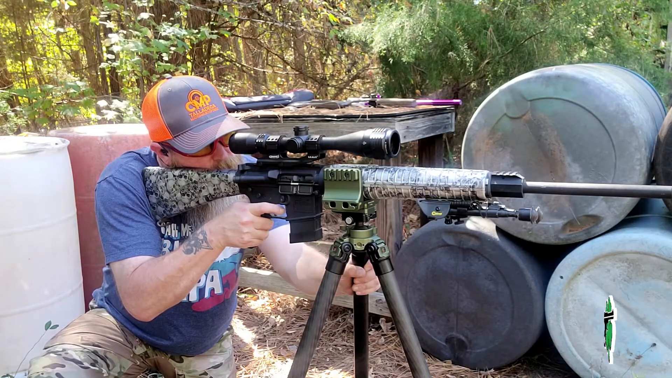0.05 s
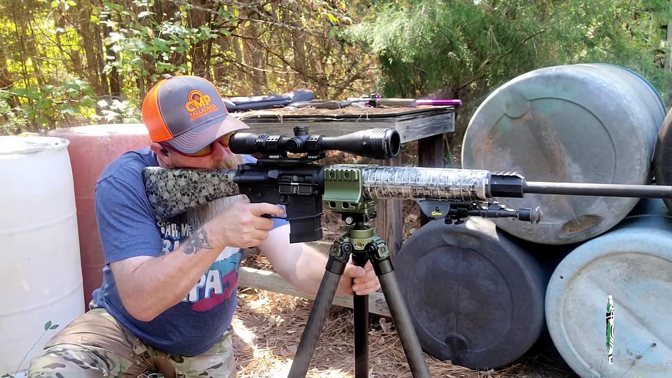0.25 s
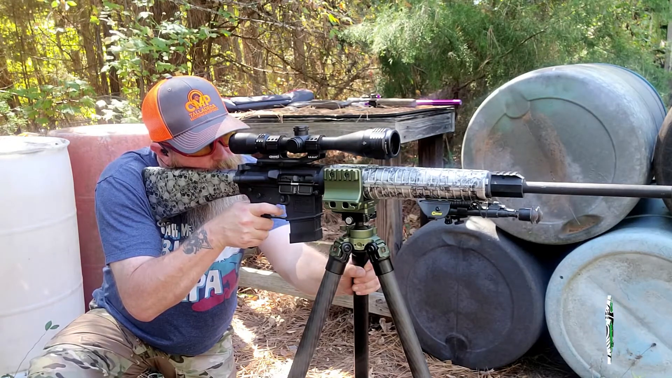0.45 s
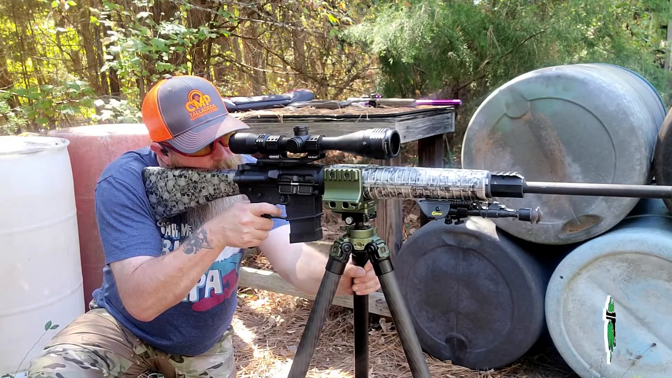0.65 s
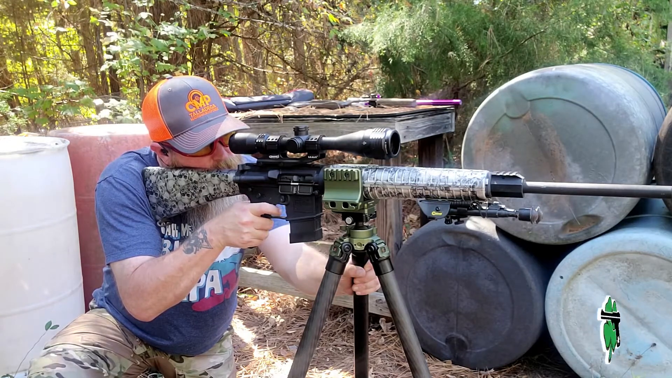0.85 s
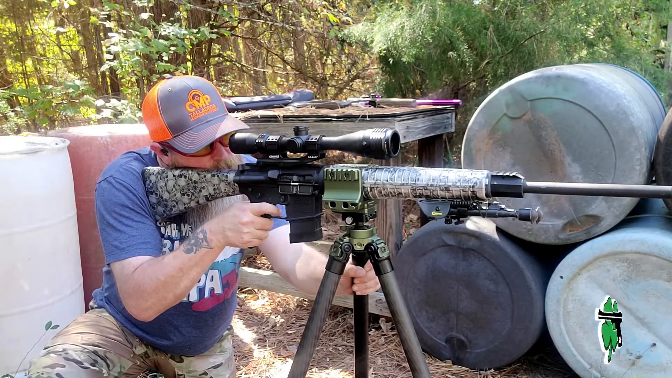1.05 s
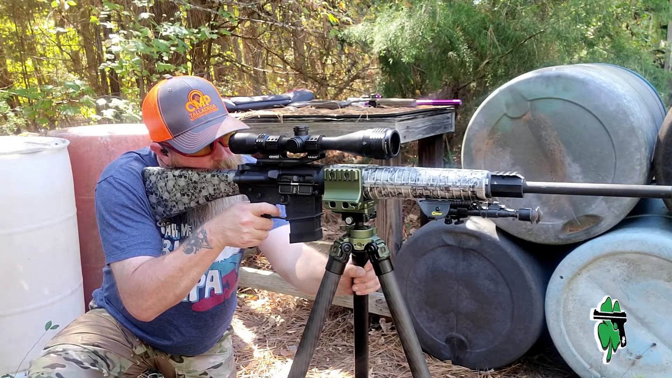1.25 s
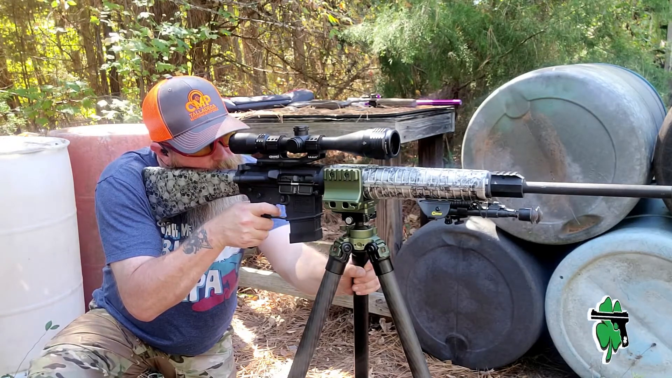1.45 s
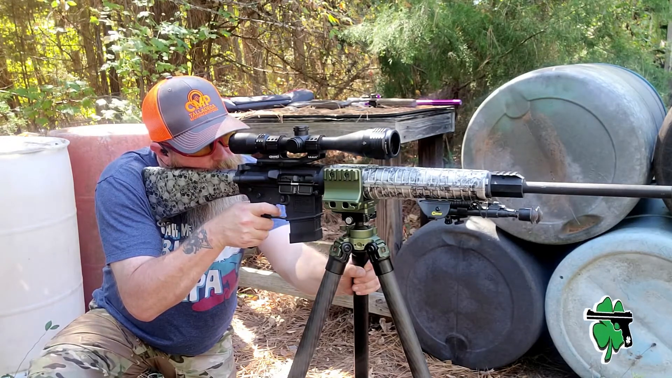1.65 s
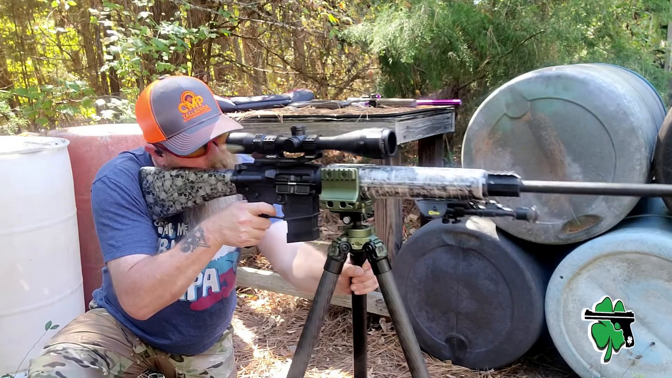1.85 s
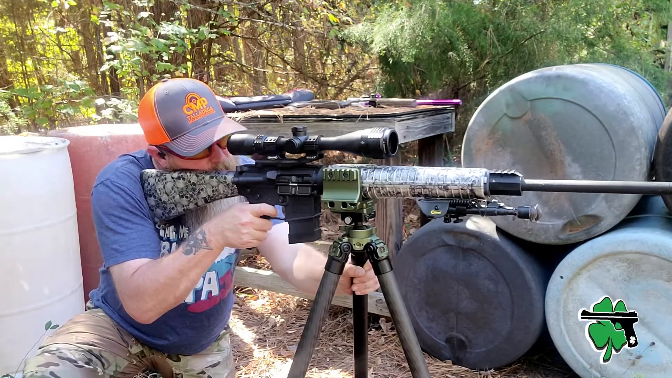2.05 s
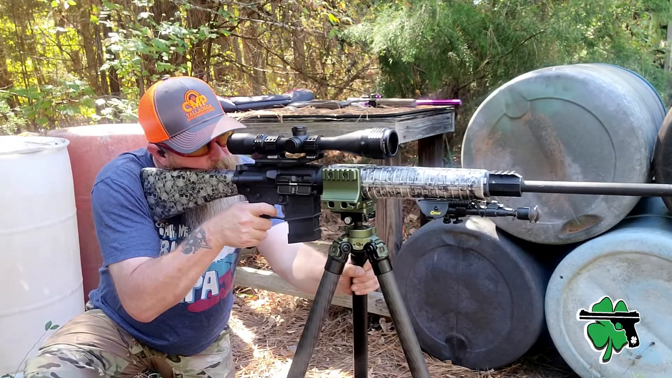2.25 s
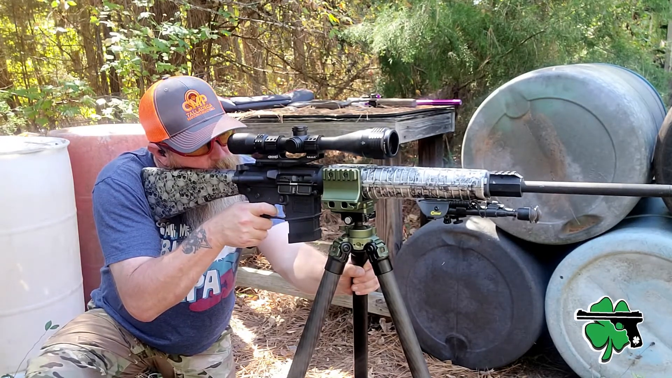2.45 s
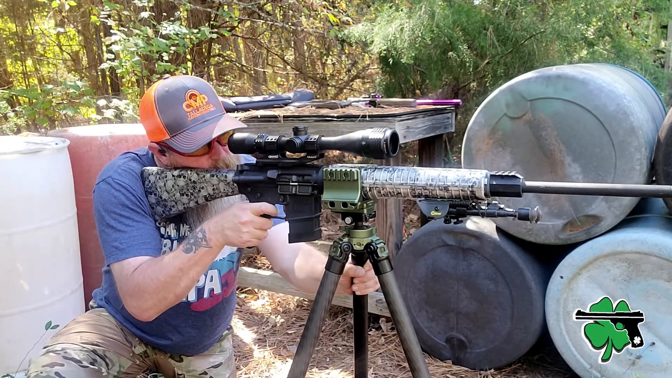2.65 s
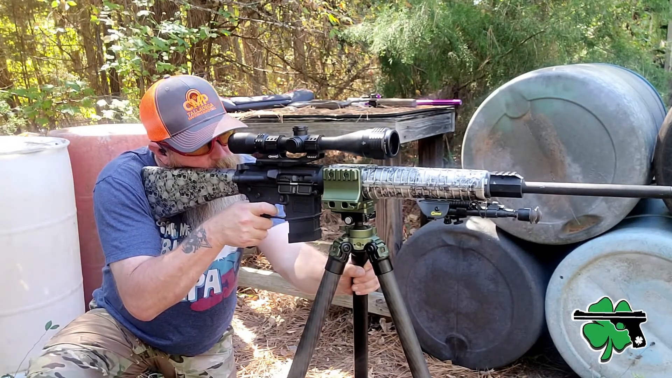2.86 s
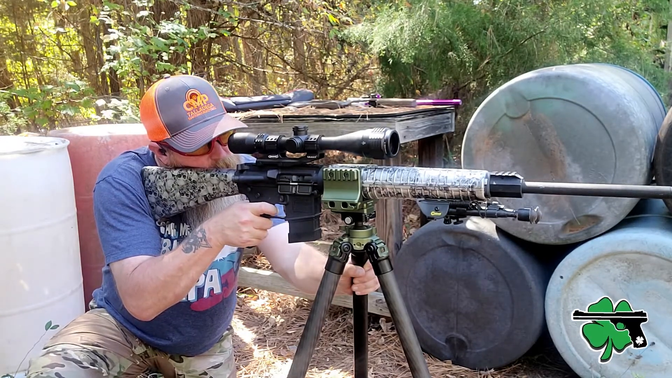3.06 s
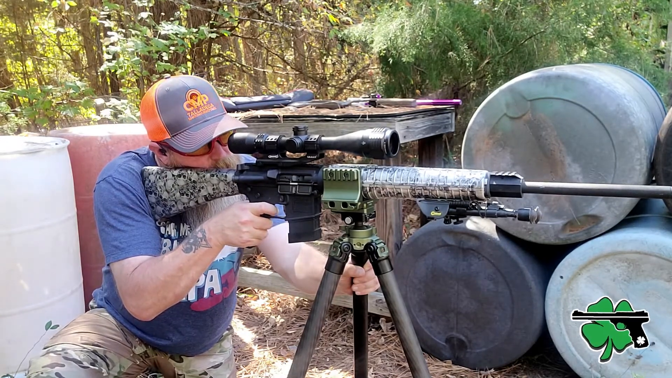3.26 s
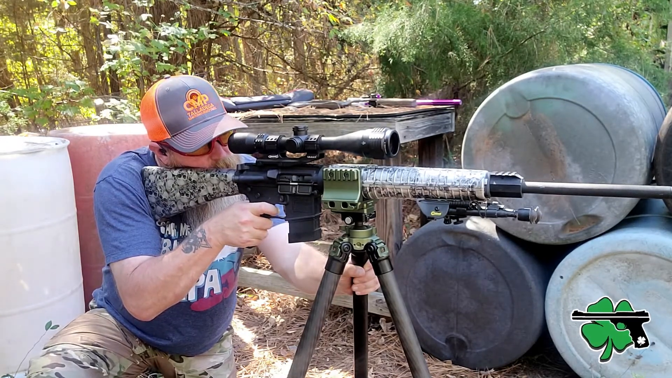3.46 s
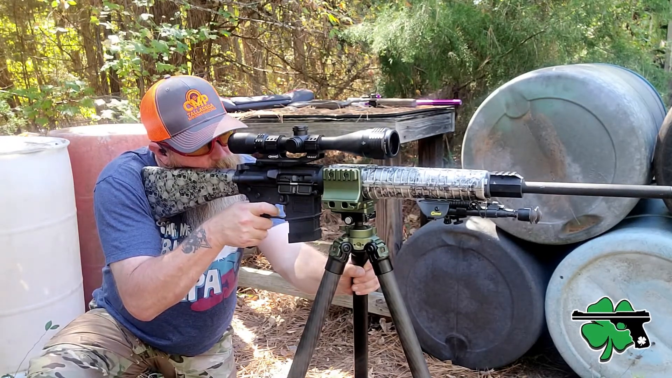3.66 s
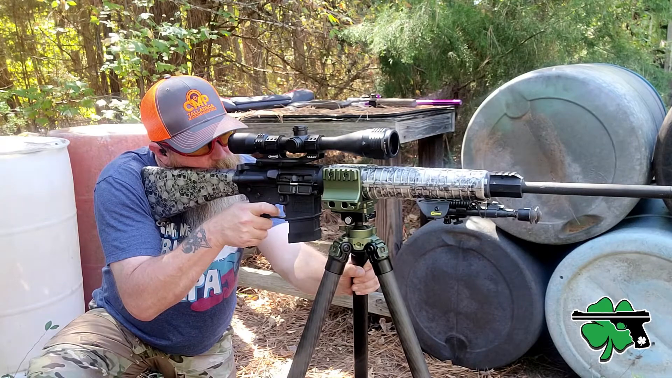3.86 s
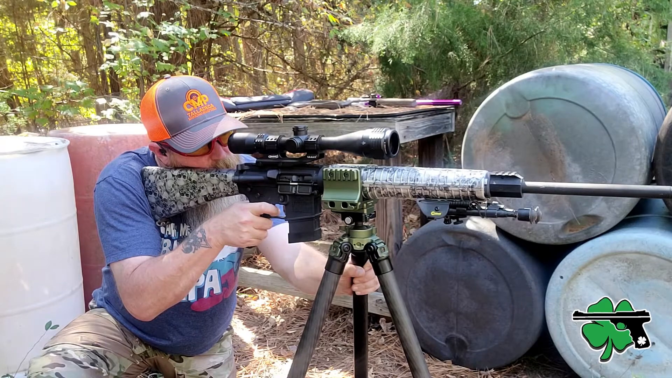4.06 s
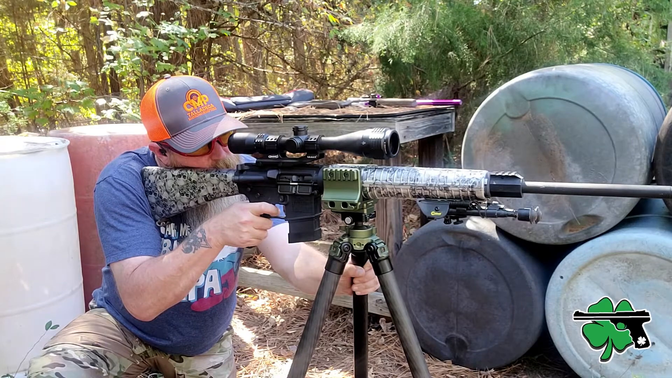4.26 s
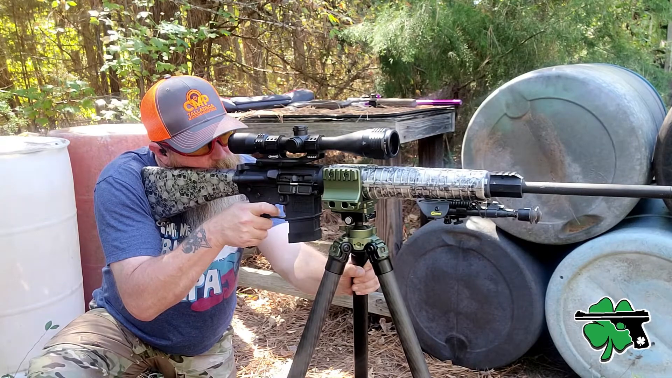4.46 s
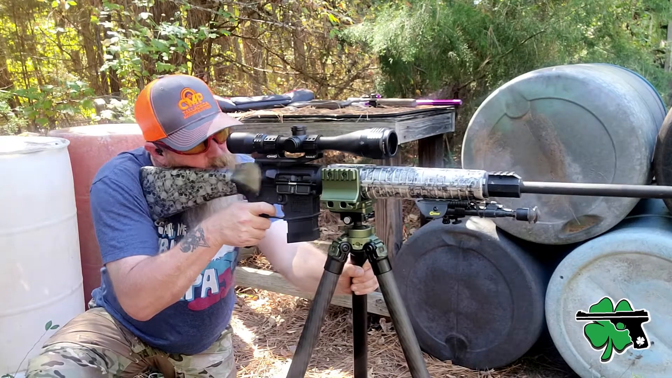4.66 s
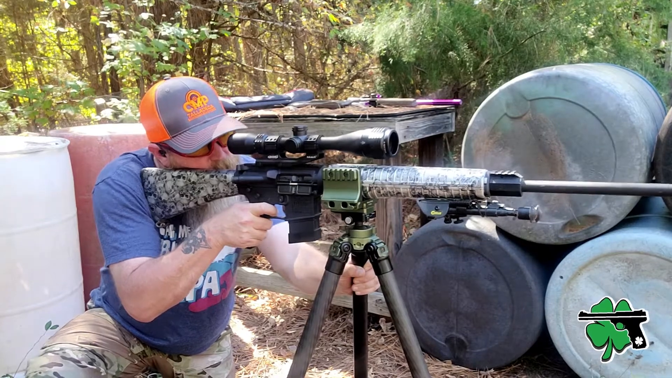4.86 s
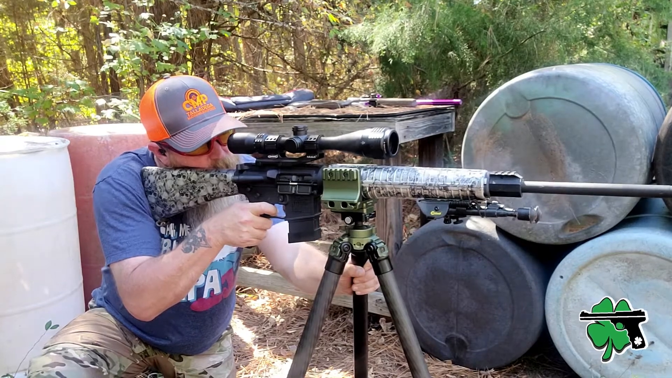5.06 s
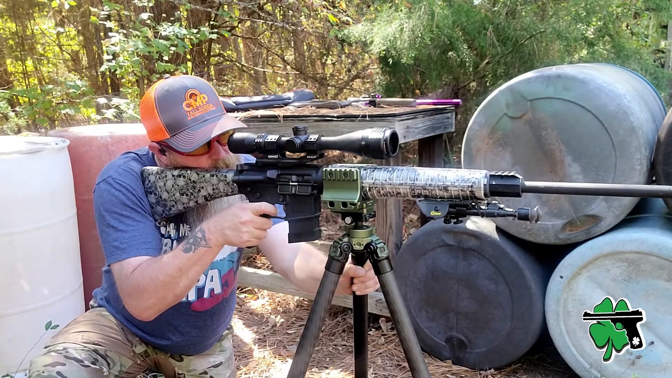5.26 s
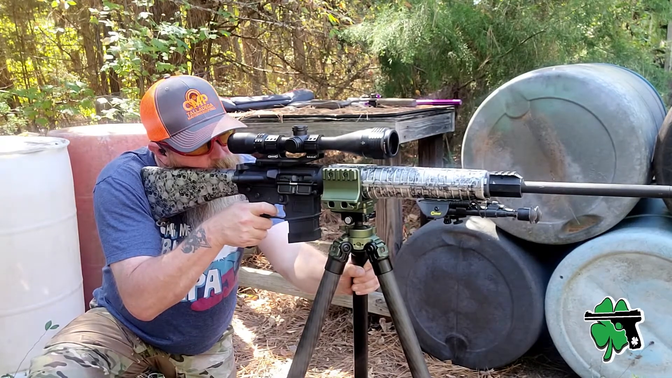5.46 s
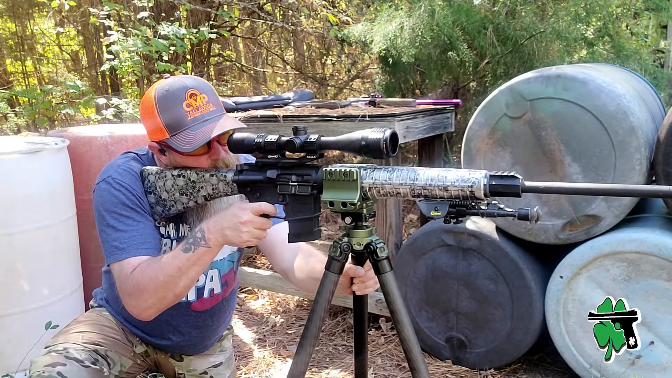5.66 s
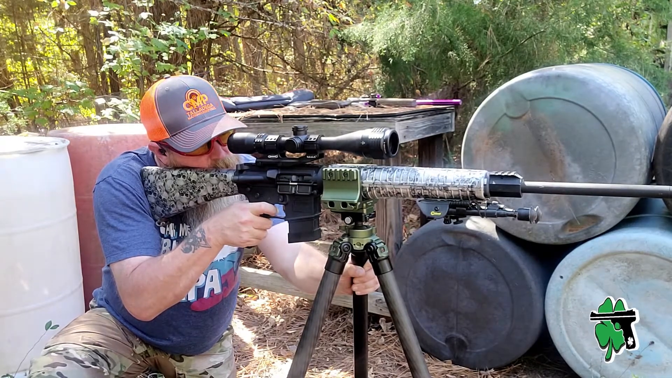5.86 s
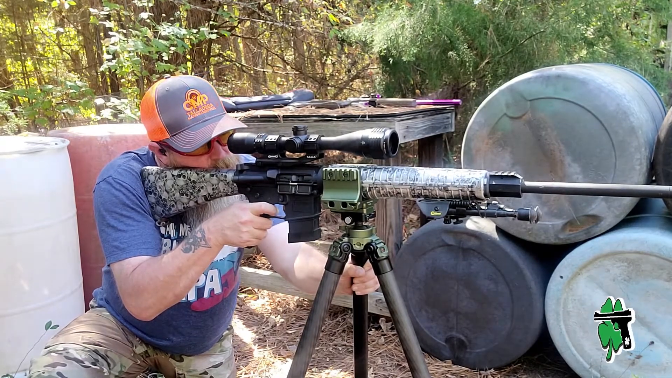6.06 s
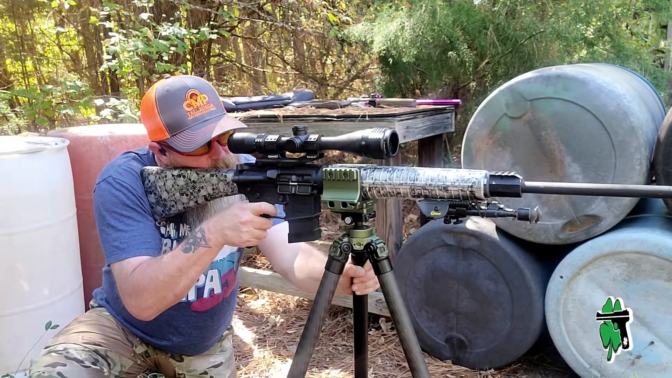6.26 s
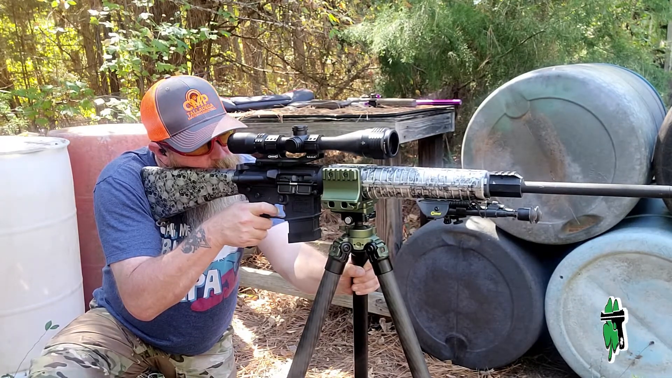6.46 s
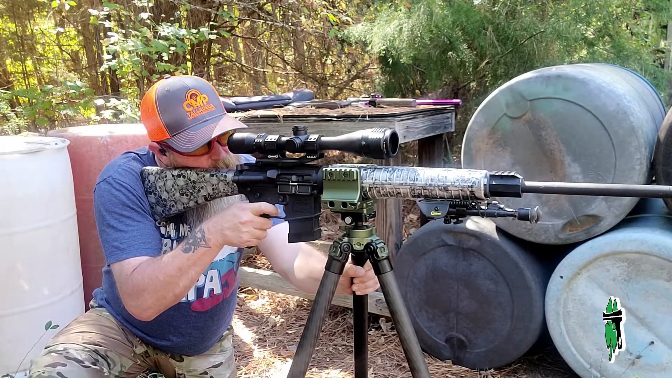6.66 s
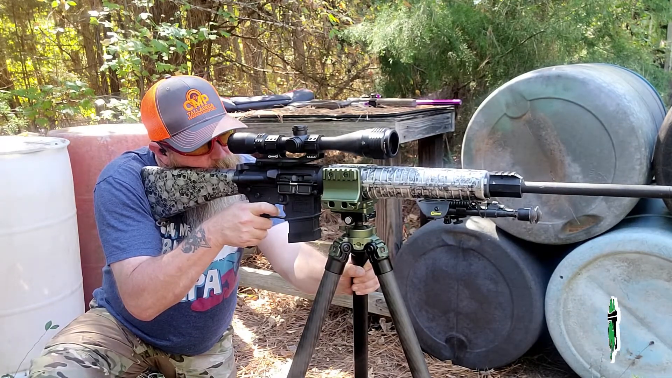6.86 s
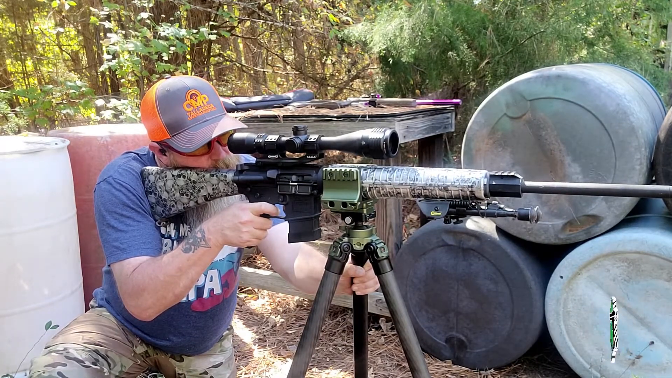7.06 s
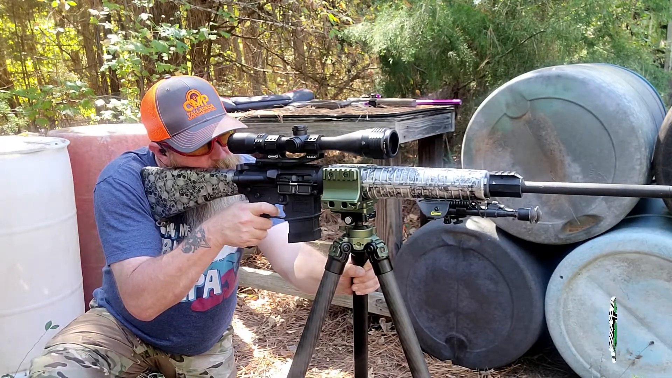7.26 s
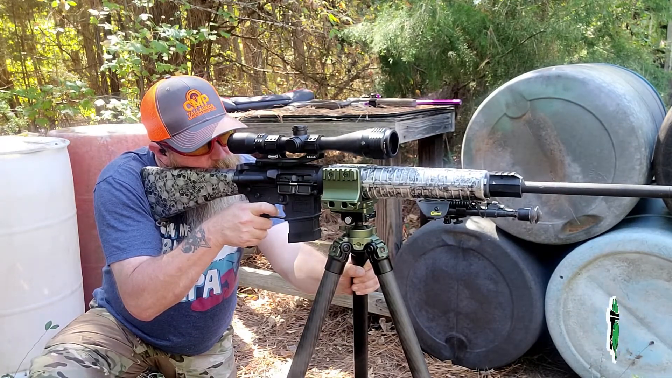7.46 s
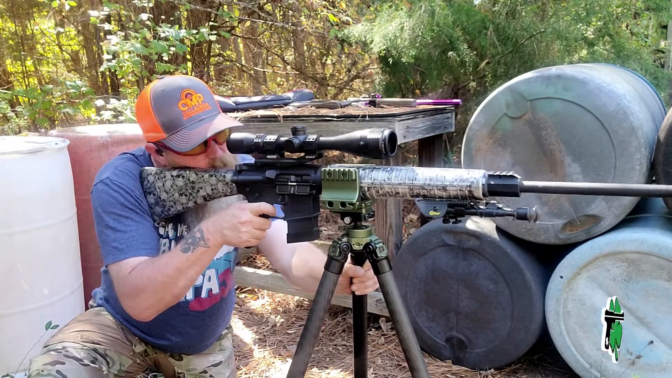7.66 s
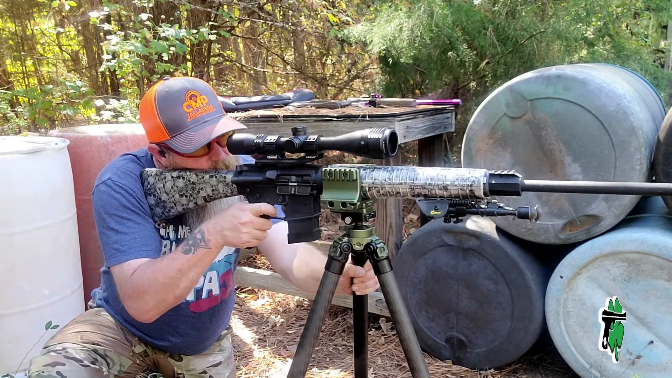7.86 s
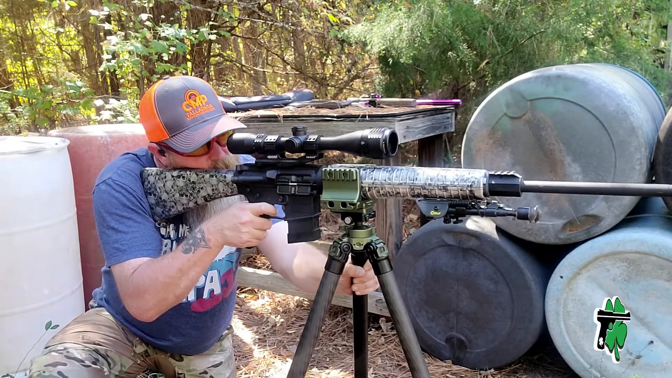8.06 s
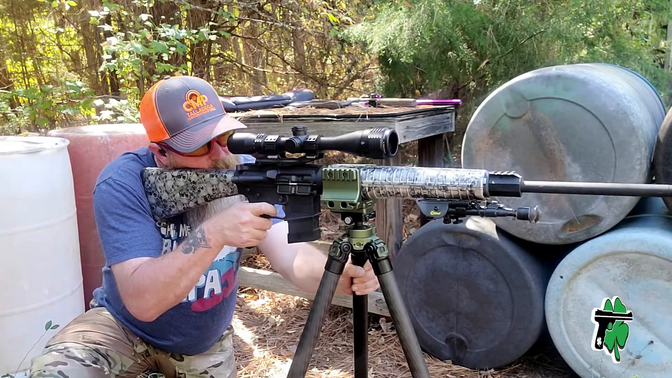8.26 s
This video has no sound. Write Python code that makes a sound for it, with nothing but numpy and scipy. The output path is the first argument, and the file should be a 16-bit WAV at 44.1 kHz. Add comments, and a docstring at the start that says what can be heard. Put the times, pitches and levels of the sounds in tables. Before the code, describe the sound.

Very faint outdoor air lies under the whole scene. A small, dull click comes from a rifle at about 0.3 seconds. At 1.9 seconds the semi-automatic rifle fires: a loud, sharp blast that overloads the close microphone, with the clack of the bolt cycling and a hollow boom from nearby plastic drums. Quick echoes come back from the trees, die down over about a second and roll on faintly. A sharp metallic click of the action follows at 3.6 seconds. The second shot comes at 4.6 seconds, and a spent brass case bounces with a bright tinkle around 5 seconds. The action clicks sharply again at 6.7 seconds. The third shot, just as loud, lands at 7.6 seconds and its echo fades, with a barely audible tick of brass near 8.2 seconds. The shots are centred and the clicks sit slightly right.

```python
"""Faint outdoor air and the clicks of a rifle's action, then three semi-automatic shots from a tripod.
Each time the hammer falls, the blast overloads a close microphone and the bolt cycles; plastic drums
beside the rifle boom along, and the edge of a wood throws the report back and lets it roll on.
Between shots the action clicks and spent cases tinkle; the gain ducks, then lets the air swell back."""
import sys
import numpy as np
from scipy import signal
from scipy.fft import rfft, irfft
from scipy.io import wavfile

SR = 44100
rng = np.random.default_rng(int(sys.argv[2]) if len(sys.argv) > 2 else 0)


def bounce(signal):
    """Save signal as a 16-bit WAV file at the path given by the first command-line argument."""
    frames = np.transpose(np.atleast_2d(signal))
    limited = np.clip(frames, -1, 1)
    pcm = np.round(limited * 32767).astype(np.int16)
    wavfile.write(sys.argv[1], SR, pcm)


N = 366030
TOP_HZ, TAIL_S = 15400, 1.8
T = np.arange(int(TAIL_S * SR)) / SR


def undb(db):
    """Decibels to gain."""
    return 10 ** (np.asarray(db) / 20)


def fade(t, t60):
    """Exponential decay, 60 dB in t60 seconds."""
    return np.exp(-np.log(1000) * t / t60)


def add(out, s, x):
    """Mix x into out from time s on."""
    i = max(int(s * SR), 0)
    out[i:i + len(x)] += x[:max(len(out) - i, 0)]


def across(table, hz, column=1):
    """Interpolate a table column over log frequency."""
    rows = np.array(table, float)
    return np.interp(np.log(hz + 1), np.log(rows[:, 0]), rows[:, column])


def butter(x, order, hz, kind):
    """Butterworth filter."""
    return signal.sosfilt(signal.butter(order, hz, kind, fs=SR, output="sos"), x)


def band(x, lo_hz, hi_hz):
    """Band-pass with second-order skirts."""
    return butter(x, 2, [lo_hz, min(hi_hz, SR / 2 - 1)], "band")


def unit(x):
    """Scale to unit rms."""
    return x / np.std(x)


def burst(table, noise):
    """Colour white noise; each half octave decays at its own rate."""
    n = len(noise)
    hz = np.fft.rfftfreq(n, 1 / SR)
    spectrum = rfft(noise) * undb(across(table, hz)) * np.sqrt(SR / 2)
    half_octaves = 2 * np.log2(np.maximum(hz, 20) / 20)
    out = np.zeros(n)
    for k in range(21):
        part = irfft(spectrum * np.maximum(1 - abs(half_octaves - k), 0), n)
        out += part * fade(T[:n], across(table, 20 * 2 ** (k / 2), column=2))
    return out


def thump(centre_s, hz, width_s):
    """Pressure wave of a cycle or two."""
    return -np.cos(2 * np.pi * hz * (T - centre_s)) * np.exp(-((T - centre_s) / width_s) ** 2)


# outdoor air: (frequency [Hz], relative density [dB])
AIR_SPECTRUM = [(15, -37), (25, -7.5), (59, -3), (118, -7), (158, -13), (326, -15.5), (415, -8.5),
                (558, -6.5), (637, -6.5), (927, -10.5), (1350, -24), (2370, -28.5), (5010, -25.5),
                (7480, -34.5), (15000, -36.5)]


def air(level_db=-64.5, stereo_spread=.3, hiss_db=-1, rush_hz=1300, swell_db=2.0, swell_s=.7):
    """A distant rush swells at random under an even hiss."""
    hz, t = np.fft.rfftfreq(N, 1 / SR), np.arange(N) / SR
    common, left, right = irfft(rfft(rng.standard_normal((3, N))) * undb(across(AIR_SPECTRUM, hz)), N)
    noise = undb(level_db) * unit(common + stereo_spread * np.array([left, right]))
    rush = irfft(rfft(noise) / (1 + (hz / rush_hz) ** 4), N)
    gusts = rng.standard_normal(40)
    swell = undb(swell_db * np.interp(t / swell_s, np.arange(len(gusts)), gusts))
    return rush * swell + undb(hiss_db) * (noise - rush)


def ring(modes, t):
    """Damped modes, random phases."""
    return sum(undb(db) * fade(t, t60) * np.sin(2 * np.pi * (hz * t + rng.random()))
               for hz, db, t60 in modes)


# receiver, stock and tripod legs, with the long rings of the plastic drums near 512 and 1076 Hz: (frequency
# [Hz], level [dB], t60 [s])
RIFLE_MODES = [(512, -39.5, .74), (515.4, -11, .045), (690, -4.5, .043), (860, -4.5, .036),
               (1045, 2.5, .045), (1076, -31.5, .15), (1344, -10, .027), (1487, -12.5, .028),
               (2140, -6.5, .026), (3050, -2.5, .024), (3400, -15.5, .018), (4000, -13, .018),
               (5278, -14.5, .041), (5880, -7, .022), (6800, -11.5, .022), (7200, -8.5, .022),
               (7980, -15, .02)]
# crack of a contact: (frequency [Hz], density [dB/Hz], t60 [s])
CRACK_SPECTRUM = [(60, -52, .04), (280, -42.5, .04), (700, -37.5, .035), (1810, -38.5, .022),
                  (3600, -36, .018), (6000, -36.5, .026), (9000, -42.5, .018), (15000, -50.5, .018)]


def contact(treble_db, pitch, length, rise_s=.0018, body_rise_s=.0045, body_hz=1600, lowest_hz=400):
    """Steel on steel: crack and bright modes first, then the heavier body; small parts radiate no bass."""
    t = T[:SR // 2]
    steel = [(hz * pitch, db + treble_db, t60 * length) for hz, db, t60 in RIFLE_MODES if hz > body_hz]
    body = [(hz * pitch, db, t60 * length) for hz, db, t60 in RIFLE_MODES if hz <= body_hz]
    spectrum = [(hz, db + treble_db * (hz > body_hz), t60 * length) for hz, db, t60 in CRACK_SPECTRUM]
    crack = burst(spectrum, rng.standard_normal(len(t)))
    blow = (ring(steel, t) + crack) * np.minimum(t / rise_s, 1) ** 2
    blow += ring(body, t) * np.minimum(t / (body_rise_s * length), 1)
    return butter(blow, 3, lowest_hz, "high")


# scatter of a click: (frequency [Hz], density [dB/Hz], t60 [s])
NEARBY_SPECTRUM = [(100, -83.5, .3), (330, -81, .4), (520, -69, 1.6), (950, -67.5, 1), (1500, -76.5, .42),
                   (5300, -78, .25), (9000, -79, .22), (15000, -84.5, .15)]


def surroundings(treble_db, treble_share=.4, treble_hz=1400):
    """Ground, drums and trees answer a click diffusely."""
    spectrum = [(hz, db + treble_share * treble_db * (hz > treble_hz), t60)
                for hz, db, t60 in NEARBY_SPECTRUM]
    return burst(spectrum, rng.standard_normal(SR))


# safety, trigger reset: (time [s], level [dB], treble [dB], pitch [ratio], ring length [ratio])
ACTION_CLICKS = [(.054, -53.5, -8, 0.87, 1.5), (.262, -16, -20, 0.92, 0.5), (3.6134, -10.5, 1, .99, 1.03),
                 (4.409, -43.5, -7.5, 0.95, 1.5), (6.6715, -8, 3, 1.01, 1)]


def clicks(left_db=.1, right_db=1.97, hardest_hz=19000, db_per_octave=20):
    """Action and hammer contacts, slightly right, duller when gentle, each with its scatter."""
    out = np.zeros(N)
    for s, db, treble_db, pitch, length in ACTION_CLICKS + hammer():
        cutoff_hz = min(hardest_hz * 2 ** (db / db_per_octave), TOP_HZ)
        add(out, s, undb(db) * butter(contact(treble_db, pitch, length), 2, cutoff_hz, "low"))
        add(out, s, undb(db) * length * surroundings(treble_db))
    return out * undb([[left_db], [right_db]])


# bumps on the microphone: (time [s], level [dB])
MIC_BUMPS = [(.108, -46.5), (.321, -53), (1.32, -55)]


def bumps(lead_s=.1):
    """Soft knocks on the microphone, one low pulse each."""
    out = np.zeros(N)
    for s, db in MIC_BUMPS:
        add(out, s - lead_s, undb(db) * thump(lead_s, hz=52.3, width_s=.02))
    return out


def hammer(lead_s=.0105, db=-11, treble_db=15, pitch=.94, length=.4):
    """Click rows for the hammer: a short, bright contact just before each shot."""
    return [(s - lead_s, db, treble_db, pitch, length) for s, _ in MUZZLE_BLASTS]


# shots: (time [s], level [dB])
MUZZLE_BLASTS = [(1.897, 6.5), (4.6415, 6.5), (7.631, 6.4)]


def shots(gas_db=-9):
    """Each shot: blast, gas thump, echoes, drum boom, wood scatter and bolt."""
    out, slaps = np.zeros(N), echoes()
    near_noise, far_noise = rng.standard_normal((2, len(T)))
    gas = undb(gas_db) * thump(centre_s=.031, hz=57, width_s=.012)
    for s, db in MUZZLE_BLASTS:
        report = blast(near_noise) + gas + slaps
        add(out, s, undb(db) * (report + drums(report) + wood(far_noise) + bolt()))
    return out


def paths(steady_noise, steady_hz=2200):
    """Long waves take the same paths every shot; moving air and leaves scramble the short ones."""
    steady_share = 1 / (1 + (np.fft.rfftfreq(len(T), 1 / SR) / steady_hz) ** 2)
    scrambled = rfft(rng.standard_normal(len(T))) * np.sqrt(1 - steady_share)
    return irfft(rfft(steady_noise) * np.sqrt(steady_share) + scrambled, len(T))


# near field of the blast: (frequency [Hz], density [dB/Hz], t60 [s])
BLAST_SPECTRUM = [(25, -60, .3), (70, -37.5, .25), (150, -33, .25), (300, -27, .15), (574, -20, .23),
                  (920, -23.5, .089), (1900, -20.5, .095), (3500, -26, .055), (6500, -21.5, .035),
                  (15000, -33.5, .061)]


def blast(noise, rise_s=.004):
    """Broadband muzzle burst; the bass outlasts the treble."""
    return burst(BLAST_SPECTRUM, paths(noise)) * np.minimum(T / rise_s, 1)


# hollow plastic drums: (frequency [Hz], bandwidth [Hz], gain [dB])
DRUM_MODES = [(540, 35, 0), (720, 30, -4.5), (70, 20, -3), (144, 40, -5.5), (353, 60, -8.5)]


def drums(report):
    """The drums resonate, driven by the report."""
    return sum(undb(db) * signal.lfilter(*signal.iirpeak(hz, hz / width_hz, SR), report)
               for hz, width_hz, db in DRUM_MODES)


# scatter from the wood: (frequency [Hz], density [dB/Hz], t60 [s])
WOOD_SPECTRUM = [(25, -75, 1.1), (65, -43.5, 1.35), (150, -39.5, 1.15), (410, -45.5, 1.305),
                 (650, -39, 1.35), (950, -40, 1.42), (1400, -50, 1.5), (2600, -43.5, 1.037),
                 (3600, -50, .97), (4900, -45.5, .8), (7110, -49.5, .65), (10450, -48.5, .47),
                 (15000, -50.5, .37)]


def wood(noise, rise_s=.012):
    """Trees scatter the blast into a long tail."""
    return burst(WOOD_SPECTRUM, paths(noise)) * np.minimum(T / rise_s, 1)


def reflection(t60_s, lo_hz, hi_hz, rise_share=.04):
    """One echo as a band of decaying noise; a deep reflector swells more slowly."""
    t = T[:SR // 2]
    envelope = fade(t, t60_s) * np.minimum(t / (rise_share * t60_s), 1)
    return unit(band(rng.standard_normal(len(t)), lo_hz, hi_hz) * envelope) * np.std(envelope)


# strongest slaps from banks and trunks: (delay [s], level [dB])
STRONG_SLAPS = [(.074, -3), (.088, -4.5), (.129, -6.5), (.145, -1.5), (.166, -7.5), (.228, -14.5),
                (.271, -18.5), (.342, -17.5)]
# wash from thickets: (delay [s], level [dB], upper edge [Hz])
THICKET_WASHES = [(.204, -21, 7340), (.46, -29, 1110)]


def echoes(trunks=14, first_s=.04, last_s=.55, trunk_db=-15, db_per_doubling=5.5):
    """Strong slaps, random trunk slaps that weaken with path length, and the thickets' soft wash."""
    out = np.zeros(len(T))
    delays_s = first_s + (last_s - first_s) * (np.arange(trunks) + rng.random(trunks)) / trunks
    weak_slaps = [(s, trunk_db - db_per_doubling * np.log2(s / first_s)) for s in delays_s]
    for s, db in STRONG_SLAPS + weak_slaps:
        add(out, s, undb(db) * reflection(t60_s=.058, lo_hz=200, hi_hz=880))
    for s, db, hi_hz in THICKET_WASHES:
        add(out, s, undb(db) * reflection(t60_s=.44, lo_hz=456, hi_hz=hi_hz))
    return out


def bolt(home_s=.0685, home_db=-11.5, scrape_s=.083, scrape_width_s=.022, scrape_db=-12):
    """The carrier slams home amid its own scrape."""
    scrape = unit(band(rng.standard_normal(len(T)), lo_hz=1800, hi_hz=7500))
    out = undb(scrape_db) * scrape * np.exp(-((T - scrape_s) / scrape_width_s) ** 2)
    add(out, home_s, undb(home_db) * contact(treble_db=12, pitch=.59, length=1))
    return out


def roll(level_db=-45, rise_s=.9, t60_s=5.3, lo_hz=420, hi_hz=1200):
    """Each report rolls on faintly through the distant forest, in a steep-sided band."""
    out, t = np.zeros(N), np.arange(N) / SR
    envelope = np.minimum(t / rise_s, 1) * fade(t, t60_s)
    for s, _ in MUZZLE_BLASTS:
        noise = band(rng.standard_normal(N), lo_hz, hi_hz)
        add(out, s, envelope * unit(band(noise, lo_hz, hi_hz)))
    return undb(level_db) * out


# cases landing on stone or leaves: (time [s], level [dB], hardest-driven frequency [Hz], ring [dB])
CASE_LANDINGS = [(2.533, -43, 6040, -20.5), (4.953, -10.5, 4480, 0), (5.036, -15.5, 2330, 1),
                 (5.036, -17.5, 7500, 3), (5.194, -37, 8000, -15), (8.245, -41, 7000, -20.5)]
# brass case: (frequency [Hz], level [dB], t60 [s])
CASE_MODES = [(2340, -2.5, .07), (4460, -1.5, .033), (6680, -14, 0.16), (12700, -5, .063), (14500, -2, .16)]


def brass(tick_db=-13, tick_t60_s=.069, focus_db_per_octave=16):
    """A spent case ticks on the ground and rings; the point of contact picks the modes."""
    out, t = np.zeros(N), T[:SR // 2]
    for s, db, struck_hz, ring_db in CASE_LANDINGS:
        modes = [(hz, mode_db - focus_db_per_octave * abs(np.log2(hz / struck_hz)), t60)
                 for hz, mode_db, t60 in CASE_MODES]
        tick = unit(band(rng.standard_normal(len(t)), struck_hz / 2, struck_hz * 2)) * fade(t, tick_t60_s)
        add(out, s, undb(db) * (undb(ring_db) * ring(modes, t) + undb(tick_db) * tick))
    return out


def scene(air_left_db=-4, air_right_db=1.2):
    """Shots and brass centred; clicks, air and bumps stronger on the right."""
    rifle = shots() + roll() + clicks() + brass()
    return rifle + (air() + bumps()) * undb([[air_left_db], [air_right_db]])


def gain_control(x, threshold_db=-11, deepest_db=7, release_db_per_s=12, sense_s=.05):
    """Loud sound ducks the gain at once, to a limit; it recovers at a steady rate."""
    step = 1 / (sense_s * SR)
    power = signal.lfilter([step], [1, step - 1], np.mean(x ** 2, axis=0))
    level_db = 10 * np.log10(power + 1e-18)
    released_db = release_db_per_s * np.arange(N) / SR
    held_db = np.maximum.accumulate(level_db + released_db) - released_db
    return x * undb(-np.clip(held_db - threshold_db, 0, deepest_db))


def record(dry, ceiling=.92, knee=10, rumble_hz=24):
    """The microphone sheds rumble, the gain ducks, the input stage flattens the blast, the top is cut."""
    ducked = gain_control(butter(dry, 3, rumble_hz, "high"))
    clipped = ducked / (1 + abs(ducked / ceiling) ** knee) ** (1 / knee)
    return signal.sosfilt(signal.ellip(8, .2, 70, TOP_HZ, fs=SR, output="sos"), clipped)


dry = scene()
out = record(dry)
bounce(out)
```